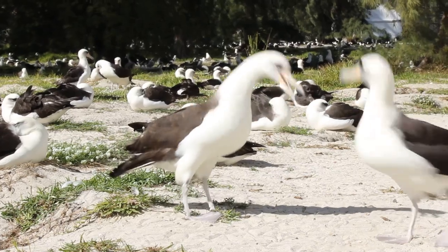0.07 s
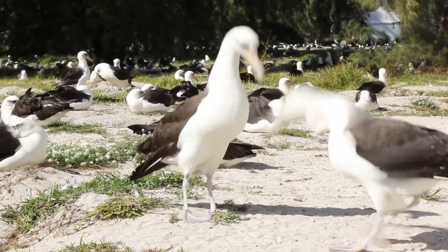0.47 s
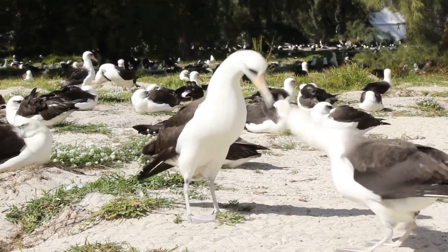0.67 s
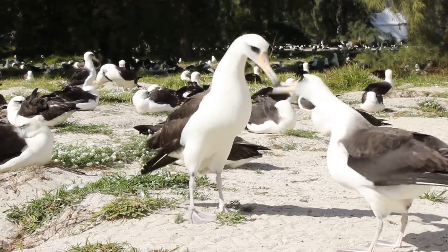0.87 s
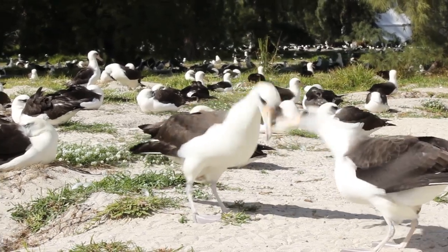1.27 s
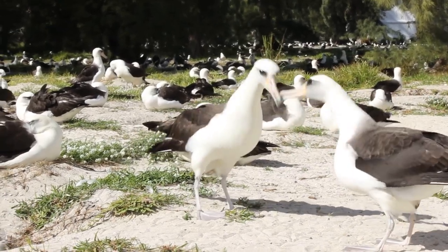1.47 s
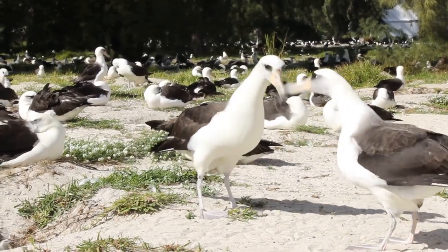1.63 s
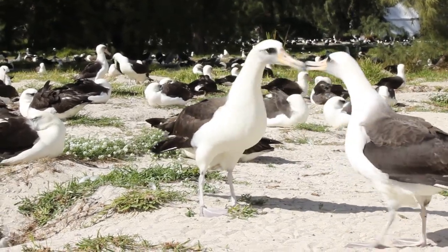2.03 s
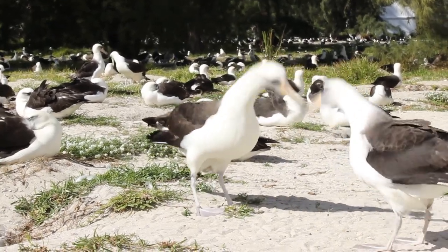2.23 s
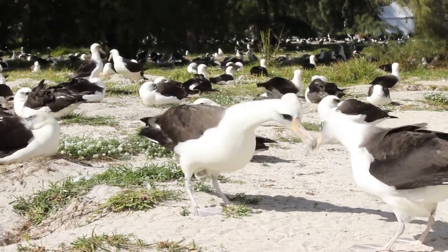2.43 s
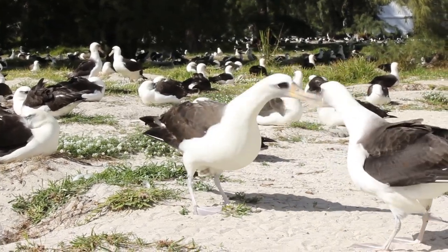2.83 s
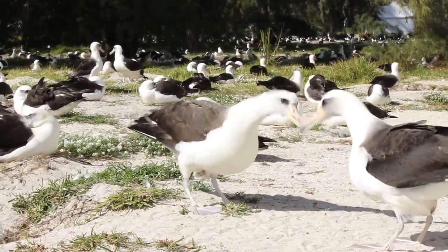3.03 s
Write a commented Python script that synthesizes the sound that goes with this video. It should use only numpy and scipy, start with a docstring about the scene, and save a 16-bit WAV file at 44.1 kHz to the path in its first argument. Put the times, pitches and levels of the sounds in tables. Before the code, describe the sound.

A long wavering albatross squeal with thin whistles and a few bill clicks amid colony hiss.

```python
"""Two albatrosses dance on open sand in a large colony. From the start there is a background hiss,
other birds whistle farther off, and bills click now and then. One dancer gives a hoarse falling cry,
and its partner joins in with a thin, sinking whistle. The cry gives way to a long wavering squeal; the
hiss dips as it begins, then swells back. The squeal flips between a low and a high voice (two registers)
and turns raspy with strain. A last few clicks and far whistles end the scene."""
import sys
import numpy as np
from scipy import signal
from scipy.fft import rfft, irfft, next_fast_len
from scipy.io import wavfile
from scipy.ndimage import map_coordinates

SR = 44100
rng = np.random.default_rng(int(sys.argv[2]) if len(sys.argv) > 2 else 0)


def wrap_up_sound(samples):
    """Save the sound to the file named by the first command line argument, as 16-bit audio."""
    columns = np.atleast_2d(samples).T
    # keep every value between -1 and 1, then stretch to whole-number steps
    tamed = np.clip(columns, -1, 1)
    steps = np.round(tamed * 32767).astype(np.int16)
    wavfile.write(sys.argv[1], SR, steps)


N = 136710

# Tone colour of the colony's hiss and of a low rumble (frequency [Hz], relative level [dB])
COLONY_COLOUR = [(25,-6.5),(80,-1.5),(800,4.5),(1600,7),(2350,4),(2800,11.5),(3200,15.5),(3800,4.5),(6000,-7.5),(7500,-18),(15500,-28)]
RUMBLE_COLOUR = [(100,-10.5),(220,-17),(600,-71.5)]
# Background hiss that ducks as the loud squeal begins, then swells back (time [s], level [dB])
BACKGROUND_LEVEL = [(0,-35.5),(.6,-31),(.7,-41.5),(1.35,-32),(3.1,-34.5)]
# Far whistles (start [s], end [s], first pitch [Hz], last pitch [Hz], level [dB], pitch shake [share])
NEIGHBOUR_WHISTLES = [(0,0.057,2120,2104,-31,.02),(0,0.363,3152,3273,-41,.012),(1.972,2.11,4730,5850,-36,.004),(2.738,2.919,3081,2874,-30.5,.026),(2.987,3.063,2995,2980,-32.5,.026)]

# Bill clicks (time [s], hollow knock level [dB], snap level [dB])
BILL_CLICKS = [(0.0366,-16,-25),(.627,-29,-26),(1.536,-24,-19),(1.872,-25.5,-16),(2.853,-27.5,-23.5),(2.935,-45,-28),(2.963,-35.5,-22)]
# Tones a bill rings with (frequency [Hz], relative level [dB], time to fade by 60 dB [s])
BILL_TONES = [(676,-9.5,0.031),(1160,-12.5,0.0021),(1490,11,0.0056)]
# Tone colour of the snap (frequency [Hz], relative level [dB])
SNAP_COLOUR = [(500,-38.5),(3500,14),(6000,-4.5),(9000,-15),(15000,-28)]

# Hoarse start of the cry (time [s], centre frequency [Hz], level [dB])
WHEEZE_PATH = [(0.138,2136,-54.5),(0.179,2080,-29),(.21,1935,-20.5),(0.258,1714,-29.5),(0.319,1642,-35.5),(0.373,1596,-21.5),(0.423,1552,-26),(0.478,1508,-36.5),(0.528,1535,-25),(0.579,1460,-38)]
# Tone colour of the breath in it (frequency [Hz], relative level [dB])
WHEEZE_AIR_COLOUR = [(600,-32),(1400,11),(2500,-3.5),(4200,2.5),(5500,-16),(9000,-15.5),(10500,-29),(14000,-33.5)]
# Voiced end of the cry (time [s], pitch [Hz], level [dB])
CRY_PATH = [(0.378,1315,-30),(0.414,1330,-23),(0.459,1240,-23.5),(0.504,1220,-24),(.53,1137,-19.5),(0.548,951,-17.5),(0.57,624,-30.5)]
# How the throat shapes that voice (frequency [Hz], gain [dB])
CRY_THROAT = [(600,-17),(1250,-0.5),(2000,-1),(2500,-9),(4900,-17.5),(7000,-34),(9300,-28),(13000,-48)]
# The partner's whistle (time [s], pitch [Hz], level [dB])
PARTNER_PATH = [(0.367,3755,-27),(.53,3720,-28),(.71,4085,-39.5),(0.866,4060,-34),(1.07,3968,-33),(1.272,3950,-23.5),(1.356,3803,-23),(1.414,3970,-24.5),(1.481,3663,-25),(1.847,3422,-29),(1.969,3290,-32)]

# Turning points of the squeal in its low voice (time [s], pitch [Hz])
SQUEAL_PITCH = [(.565,2680),(0.581,2840),(0.61,2750),(0.653,2960),(0.674,2915),(0.719,3130),(0.721,2935),(0.763,3000),(0.788,2910),(0.819,2970),(0.845,2890),(.872,2950),(0.908,2850),(0.953,2925),(0.977,2850),(1.011,2920),(1.039,2810),(1.086,2945),(1.123,2800),(1.158,2905),(1.188,2820),(1.233,2950),(1.279,2780),(1.31,2905),(1.355,2690),(1.393,2885),(1.447,2610),(1.485,2815),(1.522,2600),(1.57,2670),(1.606,2610),(1.632,2660),(1.675,2560),(1.696,2750),(1.764,2560),(1.815,2780),(1.866,2900),(1.906,2760),(1.944,2840),(2.007,2900),(2.056,2780),(2.092,2920),(2.127,2830),(2.171,3000),(2.2,2935),(2.295,3000),(2.331,2950),(2.364,3170),(2.396,2950),(2.439,3060),(2.473,2990),(2.531,3140),(2.562,2900),(2.603,3130),(2.65,2670),(2.705,3070),(2.745,2770),(2.783,2830),(2.8,2950),(2.842,2660)]
# Flips up to the high voice (start [s], end [s], pitch rise [%])
SQUEAL_FLIPS = [(.55,.606,9.3),(.63,1.192,11.68),(.762,.782,3.6),(.797,.833,5),(.853,.9,5.5),(1.222,1.263,11.1),(1.99,2.047,12.9),(2.08,2.124,11.2),(2.143,2.322,12),(2.354,2.387,11.6),(2.591,2.619,10.7),(2.69,2.714,10.9),(2.803,2.823,13.5)]
# Loudness of the squeal (time [s], level [dB])
SQUEAL_LEVEL = [(0.565,-22),(0.587,-7),(.61,-24),(.626,-20.5),(0.631,-6),(.65,-5.5),(.675,-10),(.83,-11.5),(.882,-13),(0.909,-10.5),(1.09,-11.5),(1.166,-14),(1.201,-24),(1.24,-10),(1.268,-16.5),(1.44,-18.5),(1.512,-23),(1.532,-45),(1.553,-19.5),(1.6,-18),(1.63,-32.5),(1.644,-21),(1.67,-20.5),(1.682,-36),(1.699,-22),(1.75,-19),(1.766,-32),(1.8,-21),(1.88,-15.5),(1.975,-16.5),(2.02,-15),(2.281,-11.5),(2.335,-19.5),(2.359,-12.5),(2.4,-19.5),(2.435,-15),(2.455,-18),(2.51,-15),(2.62,-17),(2.655,-23),(2.732,-19.5),(2.748,-46),(2.783,-58),(2.792,-19),(2.81,-12.5),(2.84,-21),(2.848,-57)]
# Overtones at 2 and 4 times its pitch, held lower when the voice is weak (time [s], level [dB])
SECOND_LEVEL = [(.6,-31.5),(1.17,-43.5),(1.205,-24),(1.24,-43),(1.28,-31.5),(1.39,-23),(1.52,-26),(1.65,-19),(1.74,-29),(1.78,-35.5),(2.18,-34),(2.45,-33.5),(2.62,-29),(2.77,-45.5),(2.83,-23.5)]
FOURTH_LEVEL = [(1.1,-63),(1.35,-65.5),(1.6,-61.5),(1.83,-58),(2.1,-50.5),(2.3,-72.5),(2.7,-47.5)]
# Moments when the vibration repeats only every second swing (start [s], end [s], level [dB])
DOUBLINGS = [(1.617,1.636,-31.5),(1.707,1.754,-25),(2.635,2.649,-32.5),(2.727,2.74,-33.5),(2.787,2.81,-32.5),(2.832,2.848,-29.5)]
# Extra tones this makes (multiple of half the pitch, relative level [dB])
DOUBLING_TONES = [(1,5),(3,0)]
# Base strength of the rasp, which also sets the strain (time [s], level [dB])
RASP_LEVEL = [(.66,-56),(1.1,-54.5),(1.3,-50.5),(1.7,-48.5),(1.96,-41.5),(2.25,-39),(2.4,-35.5),(2.48,-43),(2.59,-39),(2.85,-42)]
# Tone pairs in the rasp (multiple of half the pitch, distance to either side [Hz], relative level [dB])
RASP_PAIRS = [(1,140,2.5),(2,280,0.5),(3,230,-4.5),(7,220,-26.5),(9,220,-29)]
# Tone colour of air rushing in the throat (frequency [Hz], relative level [dB])
RASP_AIR_COLOUR = [(500,-44),(1700,8),(4800,-5),(7600,-12),(15000,-17)]


def amp(db):
    """Turn decibels into a number to multiply by."""
    return 10 ** (np.asarray(db) / 20)


def unit(x):
    """Scale a signal to an average strength (rms) of 1."""
    return x / np.sqrt(np.mean(x ** 2) + 1e-20)


def clock():
    """The time of each sample in seconds."""
    return np.arange(N) / SR


def curves(rows):
    """Join a table's points with lines: one curve for each column after the time."""
    times, *columns = np.transpose(rows)
    return [np.interp(clock(), times, column) for column in columns]


def gate(start, end, edge_s=0.0065):
    """1 between start and end, 0 outside, with soft edges."""
    return np.clip(np.minimum(clock() - start, end - clock()) / edge_s + .5, 0, 1)


def level_at(colour, hz):
    """Read a table's level at any frequency, on a log scale of frequency."""
    frequencies, levels = np.transpose(colour)
    return np.interp(np.log(hz + 1), np.log(frequencies + 1), levels)


def wobble(rate):
    """A smooth curve through `rate` random values a second."""
    return map_coordinates(rng.standard_normal(N // 8), [clock() * rate], mode="wrap")


def filtered(x, response):
    """Multiply each frequency in x by response(hz)."""
    size = next_fast_len(N + 8192)
    return irfft(rfft(x, size) * response(np.fft.rfftfreq(size, 1 / SR)), size)[..., :N]


def noise(colour):
    """Noise of strength 1 with the given tone colour."""
    return unit(filtered(rng.standard_normal(N), lambda hz: amp(level_at(colour, hz))))


def phase_of(hz):
    """Add up a moving pitch into its phase: the angle the wave has turned so far."""
    return 2 * np.pi * np.cumsum(hz) / SR


def tone(phase):
    """A pure tone of strength 1."""
    return np.sqrt(2) * np.sin(phase)


def rough_tone(phase, width_hz):
    """An uneven vibration scattered around a moving pitch."""
    a, b = filtered(rng.standard_normal((2, N)), lambda hz: 1 / np.sqrt(1 + (hz / width_hz) ** 4))
    return unit(a * np.cos(phase) + b * np.sin(phase))


def background():
    """Far birds blur into a hiss. Its level dips and swells back; a soft rumble comes and goes once."""
    hiss = amp(curves(BACKGROUND_LEVEL)[0] + wobble(10) / 2) * noise(COLONY_COLOUR)
    rumble = amp(-49.5 + 2 * wobble(18)) * noise(RUMBLE_COLOUR)
    return hiss + rumble * gate(start=1.69, end=2.12, edge_s=.05)


def neighbour_whistles():
    """Birds farther off give short sliding whistles, each with a faint overtone."""
    out = np.zeros(N)
    for start, end, first_hz, last_hz, db, shake in NEIGHBOUR_WHISTLES:
        pitch = np.interp(clock(), [start, end], [first_hz, last_hz])
        phase = phase_of(pitch * (1 + shake * wobble(500)))
        voice = tone(phase) + amp(-20) * tone(2 * phase)
        out += amp(db + 1.3 * wobble(150)) * voice * gate(start, end, edge_s=0.0098)
    return out


def bill_clicks(snap_fade_s=0.011, bass_cut_hz=380):
    """Each click is a sharp snap and a brief hollow ring of the bill."""
    out = np.zeros(N)
    for start, knock_db, snap_db in BILL_CLICKS:
        age = np.maximum(clock() - start, 0)
        ring = sum(amp(db - 60 * age / fade_s) * np.sin(2 * np.pi * hz * age)
                   for hz, db, fade_s in BILL_TONES)
        snap = (age > 0) * amp(-60 * age / snap_fade_s) * noise(SNAP_COLOUR)
        out += amp(knock_db) * ring + amp(snap_db) * snap
    return filtered(out, lambda hz: (1j * hz / (bass_cut_hz + 1j * hz)) ** 2)


def opening_cry(shake=.026):
    """A hoarse, breathy wheeze sinks, finds a pitch and plunges."""
    centre, wheeze_db = curves(WHEEZE_PATH)
    wheeze = rough_tone(phase_of(centre), width_hz=121) + amp(-8) * noise(WHEEZE_AIR_COLOUR)
    wheeze *= amp(wheeze_db) * gate(WHEEZE_PATH[0][0], WHEEZE_PATH[-1][0])
    pitch, voice_db = curves(CRY_PATH)
    phase = phase_of(pitch * (1 + shake * wobble(1100)))
    voice = sum(amp(level_at(CRY_THROAT, k * pitch)) * tone(k * phase) for k in range(1, 11))
    voice *= amp(voice_db) * gate(CRY_PATH[0][0], CRY_PATH[-1][0])
    return wheeze + voice


def partner_whistle(shake=.006, flutter_db=3.5):
    """The partner holds a thin, slightly rough tone that flutters and sinks."""
    pitch, level = curves(PARTNER_PATH)
    phase = phase_of(pitch * (1 + shake * wobble(400)))
    voice = tone(phase) + amp(-10.5) * rough_tone(phase, width_hz=190)
    voice *= amp(level + flutter_db * wobble(120))
    return voice * gate(PARTNER_PATH[0][0], PARTNER_PATH[-1][0], edge_s=0.02)


def squeal_pitch():
    """The pitch swings smoothly between turning points and jumps at each flip of the voice."""
    times, hz = np.transpose(SQUEAL_PITCH)
    points = np.arange(len(times))
    place = np.interp(clock(), times, points)
    eased = np.floor(place) + (1 - np.cos(np.pi * (place % 1))) / 2
    pitch = np.interp(eased, points, hz)
    for start, end, percent in SQUEAL_FLIPS:
        pitch *= 1 + gate(start, end, edge_s=.002) * percent / 100
    return pitch


def squeal_overtones(phase, voice_db, high_strain, flutter_db=3.2):
    """Tones at 2 to 5 times the pitch flutter; strain in the high voice weakens the one at 3 times."""
    second = np.minimum(curves(SECOND_LEVEL)[0], voice_db)
    third = voice_db - 36.5 - 153.5 * high_strain
    fourth = np.minimum(curves(FOURTH_LEVEL)[0], voice_db - 34)
    fifth = fourth - 7.5
    return sum(amp(db + flutter_db * wobble(75)) * tone(k * phase)
               for k, db in enumerate([second, third, fourth, fifth], 2))


def squeal(shake=.002, strain_shake=.07, beat_hz=400):
    """A nearly pure tone with overtones; under strain it shakes, beats and cracks."""
    level = curves(SQUEAL_LEVEL)[0]
    high = np.clip(sum(gate(start, end) for start, end, _ in SQUEAL_FLIPS), 0, 1)  # 1 in the high voice
    flipping = np.sin(np.pi * high)  # peaks at each jump into or out of the high voice
    strain = amp(np.minimum(curves(RASP_LEVEL)[0] - level, -16))  # rasp compared with voice
    phase = phase_of(squeal_pitch() * (1 + (shake + strain_shake * strain) * wobble(900)))
    overtones = squeal_overtones(phase, level, strain * high)
    voice = amp(level) * tone(phase) + amp(-10.5 * flipping) * overtones  # the overtones dip at each jump of a flip
    # A second vibration beats against the strained high voice and adds a tone on either side.
    beat = amp(13) * high * np.sin(phase_of(beat_hz * (1 + .13 * wobble(200))))
    crack = amp(19.5) * flipping
    flutter_db = .25 * wobble(310) + 1.3 * (1 - high / 2) * wobble(55)
    voice *= amp(flutter_db) * (1 + strain * (beat + crack))
    voice += rasp(phase, level, high) + period_doubling(phase)
    return voice * gate(SQUEAL_LEVEL[0][0], SQUEAL_LEVEL[-1][0])


def rasp(phase, voice_db, high):
    """Pairs of rough tones flutter around multiples of half the pitch, with a little rushing air."""
    level = np.minimum(curves(RASP_LEVEL)[0], voice_db - 19) + 4 * high  # always under the voice
    pairs = np.zeros(N)
    for k, distance_hz, db in RASP_PAIRS:
        centre = k * phase / 2
        offset = 2 * np.pi * distance_hz * clock()
        pair = sum(rough_tone(centre + side * offset, width_hz=50 * np.sqrt(k)) for side in (-1, 1))
        pairs += amp(db) * unit(pair)
    return amp(level + 2 * wobble(70)) * (pairs + amp(-6.5) * noise(RASP_AIR_COLOUR))


def period_doubling(phase):
    """For brief moments the voice repeats every second swing, adding tones below and above its pitch."""
    strength = sum(amp(db) * gate(start, end) for start, end, db in DOUBLINGS)
    return strength * sum(amp(db) * tone(k * phase / 2) for k, db in DOUBLING_TONES)


def echo(x, fade_s=0.043, delay_s=.004):
    """Sound scatters off the ground and trees and quickly dies away."""
    t = np.arange(SR // 2) / SR
    tail = rng.standard_normal(len(t)) * amp(-60 * t / fade_s) * (t > delay_s)
    return signal.fftconvolve(x, tail / np.linalg.norm(tail))[:N]


def scene():
    """Everything sounds from straight ahead; only faint echo and hiss set left and right apart."""
    birds = squeal() + opening_cry() + partner_whistle() + neighbour_whistles() + bill_clicks()
    middle = birds + amp(-25) * echo(birds) + background()
    side = amp(-26) * echo(birds) + amp(-66) * rng.standard_normal(N)
    return np.array([middle + side, middle - side])


def record(dry, top_hz=15650):
    """Cut off the very highest treble."""
    return filtered(dry, lambda hz: hz < top_hz)


dry = scene()
out = record(dry)
wrap_up_sound(out)
```